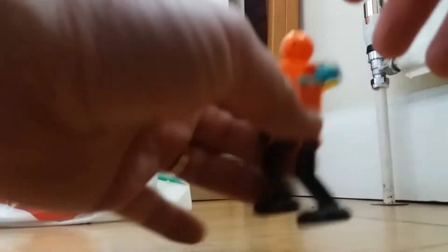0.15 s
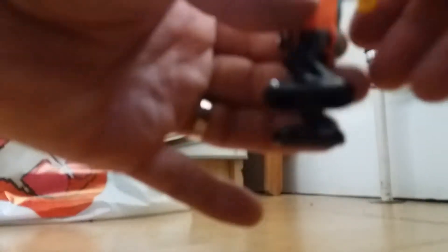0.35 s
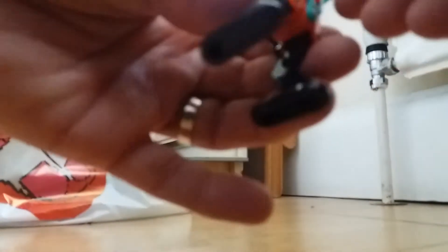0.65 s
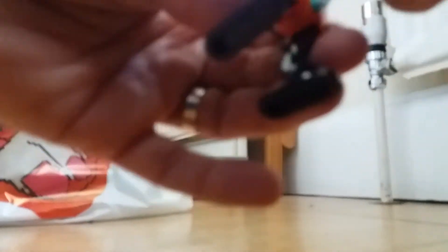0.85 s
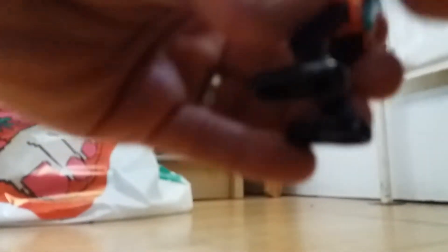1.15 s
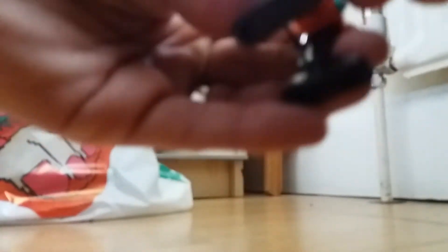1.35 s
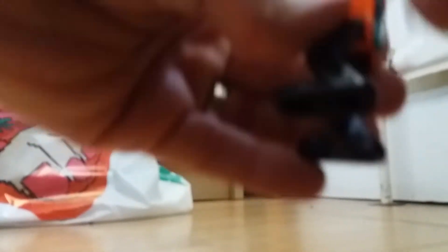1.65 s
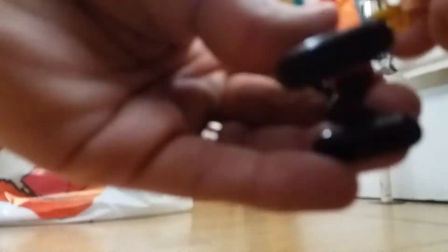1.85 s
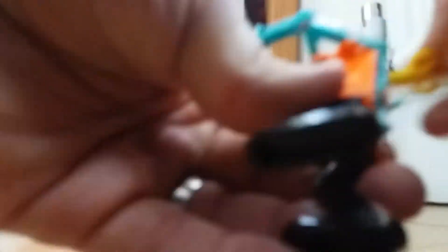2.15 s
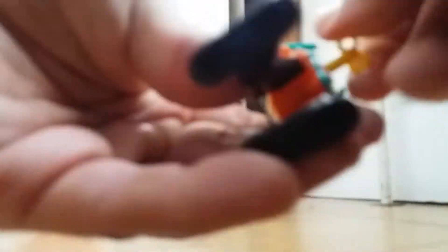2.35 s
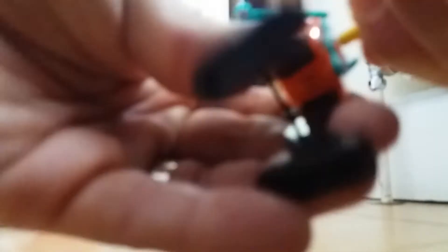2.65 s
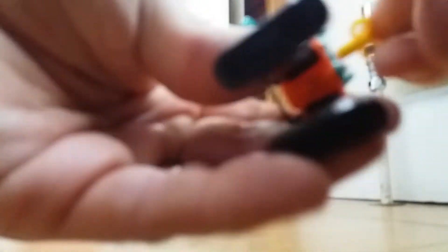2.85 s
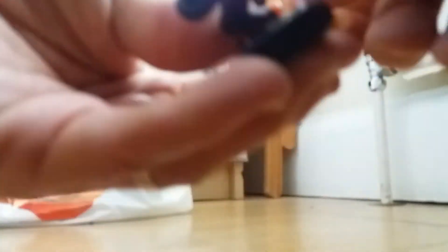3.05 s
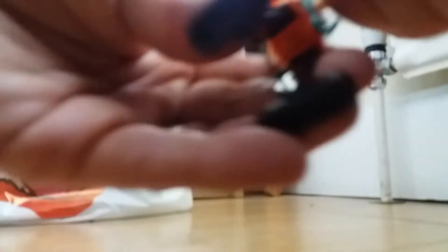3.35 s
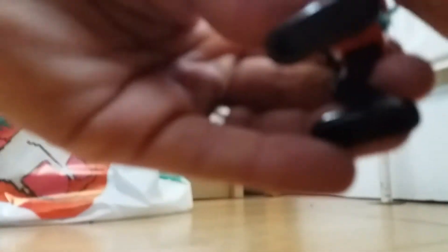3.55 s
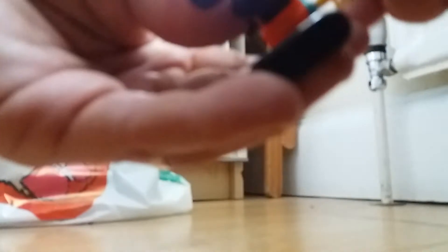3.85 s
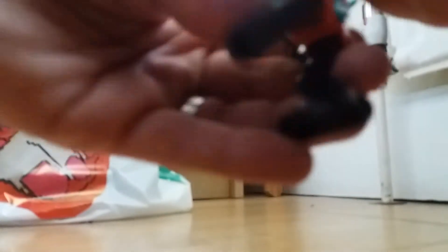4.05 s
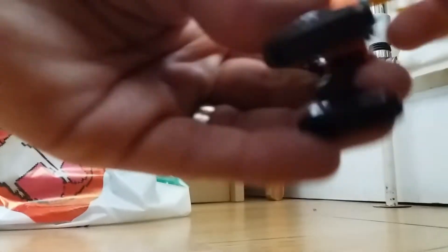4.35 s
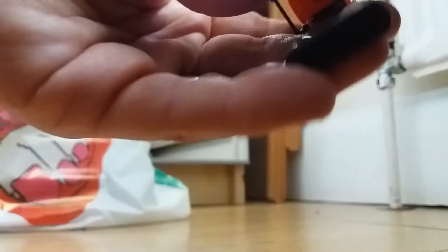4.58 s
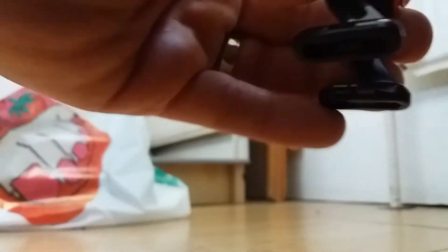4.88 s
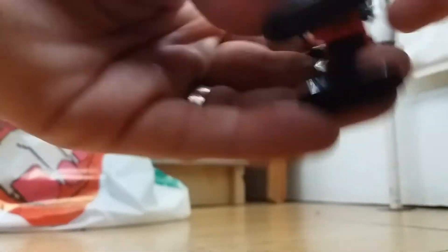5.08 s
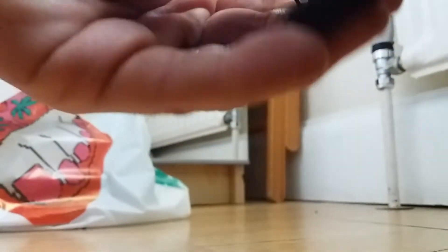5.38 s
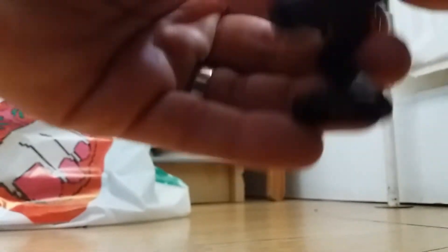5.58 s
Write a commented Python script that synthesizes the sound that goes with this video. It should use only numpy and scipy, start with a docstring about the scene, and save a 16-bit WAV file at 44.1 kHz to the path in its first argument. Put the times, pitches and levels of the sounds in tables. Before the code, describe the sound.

A small plastic clockwork toy is wound by hand, close to the microphone in a quiet room with a faint short tail and low background noise. From 0 to 0.35 s the free gears purr lightly, rising then slowing to nothing, under soft skin rubbing. At 0.8 s a dozen crisp, doubled ratchet clicks accelerate until 1.1 s, followed by tiny buzzes. Crowded crackles come at 1.45 and 1.95 s, with a brief whir at 1.65 s. A loud dry snap hits at 2.1 s, then bright whirs, the longest at 2.3 s singing thin and high. Fingers knock the case hard around 2.45-2.5 s. Clicking turns follow at 2.6, 3.3, 4.0 and 4.65 s, each about a quarter second, separated by short whirs, rapid ticks and rubs. A final small whir sounds at 5.0 s, a crackle at 5.4 s, then four slowing clicks and a faint last tick at 5.7 s.

```python
"""Winding a clockwork toy

A small plastic clockwork toy is wound by hand, close to the microphone, just above a hard floor indoors.
Each twist of the key drags a pawl over ratchet teeth; between twists the spring runs the gears in short whirs.
Every tooth is a burst of decaying noise and tones, filtered by the resonances of the part it strikes.
Fingers rub and bump the case as filtered noise, and a small room answers faintly with a decaying tail."""
import sys
import numpy as np
from scipy import signal
from scipy.fft import rfft, irfft, next_fast_len
from scipy.io import wavfile
from scipy.ndimage import uniform_filter1d

SR = 44100
rng = np.random.default_rng(int(sys.argv[2]) if len(sys.argv) > 2 else 0)


def wav_record(signal):
    """Record a signal, one row per channel, as 16-bit PCM in the file named by sys.argv[1]."""
    frames = np.transpose(np.atleast_2d(signal))
    bounded = np.clip(frames, -1, 1)
    # unit amplitude maps onto the largest positive 16-bit level
    quanta = np.round(bounded * 32767).astype(np.int16)
    wavfile.write(sys.argv[1], SR, quanta)


N = 252252
TIME = np.arange(N) / SR

# broad spectrum of a pawl blow: (frequency [Hz], level [dB])
PAWL_COLOUR = [(300, -19), (1150, -23.5), (1550, -4), (1900, -6.5), (2270, -2.5), (2700, -6.5), (3600, -3),
               (4700, -4), (6700, -12.5), (9400, -9.5), (12500, -16), (16000, -19.5)]
# resonances of the pawl and its spring: (frequency [Hz], width [Hz], level above the broad colour [dB])
PAWL_MODES = [(3707, 88, -0.5), (15060, 330, 8)]
# broad spectrum of a gearbox blow: (frequency [Hz], level [dB])
GEAR_COLOUR = [(300, -20), (1100, -20), (1600, -6), (2200, -5), (2900, -8), (3800, 1.5), (4600, 0.5),
               (5600, -5.5), (6800, -9), (8100, -3), (10000, -10), (16000, -11.5)]


def undb(db):
    """Level to amplitude: 20 dB is a factor of ten."""
    return 10 ** (np.asarray(db) / 20)


def colour(x, points, modes=(), treble_db=0):
    """Minimum-phase filtering: a causal broad colour with a treble shelf, in parallel with resonances."""
    size = next_fast_len(2 * len(x))
    hz = np.arange(size // 2 + 1) * SR / size + 1  # the offset avoids log(0)
    knots, knot_db = np.transpose(points)
    shelf_db = treble_db * hz ** 2 / (hz ** 2 + 6000 ** 2)
    db = np.interp(np.log(hz), np.log(knots), knot_db) + shelf_db
    # folding the cepstrum onto positive times gives the causal phase
    cepstrum = irfft(np.log(undb(db)), size)
    cepstrum[1:size // 2] *= 2
    cepstrum[size // 2 + 1:] = 0
    broad = np.exp(rfft(cepstrum))
    rings = sum(undb(d) / (1 + 1j * (hz ** 2 - f ** 2) / (hz * w)) for f, w, d in modes)
    return irfft(rfft(x, size) * broad * (1 + rings), size)[:len(x)]


def walk(rate):
    """Stepwise random process: normal values held 1 / rate s and smoothed into slopes."""
    hold = int(SR / rate)
    steps = np.repeat(rng.standard_normal(N // hold + 1), hold)
    return uniform_filter1d(steps, hold)[:N]


def add(out, s, x, db, head_s=0.0022):
    """Superposition: place a blow at time s, db being the RMS level of its first head_s seconds."""
    i = int(np.clip(s * SR, 0, N - 1))
    head = x[:int(head_s * SR)]
    blow = x * undb(db) / np.sqrt(np.mean(head ** 2))
    out[i:i + len(x)] += blow[:N - i]


def tick(decay_s, spot_share=0.62):
    """Impact excitation: a crack, a few modes that depend on where it lands, then the shell's faint ring."""
    t = np.arange(2048) / SR
    mode_hz = 2000 * 5 ** (rng.random((4, 1)) ** 1.3)  # 2 to 10 kHz, crowded low
    phase = rng.random((4, 1))  # in cycles
    tones = np.sin(2 * np.pi * (mode_hz * t + phase)).sum(axis=0)
    spot = tones * np.exp(-t / (1.4 * decay_s))
    fade = np.exp(-t / decay_s) + undb(-16) * np.exp(-t / .005)
    crack = rng.standard_normal(len(t)) * fade
    attack = 1 - np.exp(-(t / .0003) ** 2)
    return attack * (crack + spot_share * spot / 2)


def teeth_of(run, jitter):
    """Rotation into impacts: time, rate and level of the teeth passing as a wheel follows its speed curve."""
    s, hz, db = np.transpose(run)
    now = s[0]
    for chance in rng.standard_normal(100):  # at most 100 teeth
        rate = np.interp(now, s, hz)
        yield now, rate, np.interp(now, s, db)
        now += np.exp(jitter * chance) / rate
        if now > s[-1]:
            return


def rubbing():
    """Friction envelope: each slide swells, holds and dies away, its power added to the steady grip's."""
    # skin sliding on plastic: (start [s], length [s], level [dB])
    rubs = [(0.037, 0.12, -52.5), (0.167, 0.16, -47.5), (0.377, 0.11, -51.5), (0.804, 0.15, -50.5),
            (1.084, 0.18, -54), (1.412, 0.05, -51), (1.839, .13, -42.5), (2.167, 0.096, -46),
            (2.359, 0.19, -46), (2.626, 0.33, -57.5), (3.465, 0.27, -54.5), (3.923, 0.031, -52.5),
            (4.306, 0.096, -44), (4.795, 0.31, -50.5)]
    attack_s, release_s = 0.034, 0.045
    power = undb(-64) ** 2  # the holding hand never rests entirely
    for start, length, db in rubs:
        swell = np.clip((TIME - start) / attack_s, 0, 1)
        release = np.exp(-np.maximum(TIME - start - length, 0) / release_s)
        power = power + (undb(db) * swell * release) ** 2
    return np.sqrt(power)


def hand():
    """Forced resonance: skin rubbing in uneven slips and soft fingertip knocks sound the case's modes."""
    # broad spectrum of rubbing skin: (frequency [Hz], level [dB])
    skin_colour = [(30, -45), (50, -2), (120, -1.5), (185, -2), (300, -3.5), (400, -4.5), (620, -6),
                   (950, -11), (1700, -6.5), (3800, -13), (8000, -25), (16000, -32)]
    # the case held in the hand: (frequency [Hz], width [Hz], level above the broad colour [dB])
    case_modes = [(187, 88, 0), (395, 30, -4), (594, 280, 0), (1860, 690, -1)]
    # fingers knocking the case: (time [s], level [dB], spectral peak [Hz], decay [s])
    bumps = [(.003, -41.5, 1610, 0.0028), (.006, -46.5, 152, 0.0056), (1.224, -49.5, 570, 0.0029),
             (2.4516, -27.5, 644, 0.0049), (2.4548, -24, 1943, 0.0014), (2.496, -32.5, 1160, 0.0037),
             (2.498, -25.5, 225, 0.0051), (2.5017, -34, 420, 0.0038), (2.508, -43, 104, 0.019),
             (2.874, -45.5, 210, .017), (3.576, -38.5, 190, 0.0025), (3.618, -41.5, 1270, .0025),
             (3.621, -36.5, 182.5, 0.0064), (4.222, -41, 189.5, 0.0046)]
    slips_db = 3 * walk(rate=130)
    friction = rng.standard_normal(N) * undb(slips_db)
    skin = colour(friction, skin_colour, case_modes[:3])
    out = skin / skin.std() * rubbing()
    t = TIME[:SR // 8]
    for s, db, hz, decay in bumps:
        push = rng.standard_normal(len(t)) * np.exp(-t / decay)
        knock_colour = [(25, -40), (hz / 3, -5), (hz, 0), (2 * hz, -13), (16000, -58)]
        knock = colour(push, knock_colour, case_modes)
        add(out, s, knock, db, head_s=2 * decay)
    return out


def room_noise():
    """Stationary background: steady coloured noise of the quiet room."""
    # spectrum of the background: (frequency [Hz], level [dB])
    background_colour = [(25, -30), (45, 0.5), (100, 6), (200, -4), (600, -9), (1200, -18), (3500, -29),
                         (8000, -24.5), (16000, -23.5)]
    x = colour(rng.standard_normal(N), background_colour)
    return undb(-62) * x / x.std()


def room(x, t60_s, wet_db):
    """Reverberation: convolution with dense, exponentially decaying reflections off floor and near walls."""
    t = TIME[:SR // 2]
    decay = undb(-60 * t / t60_s) * (t > .004)  # silent for the first 4 ms
    tail = rng.standard_normal(len(t)) * decay
    tail = colour(tail, [(100, 3.5), (3500, -4.0), (8000, -1.5), (16000, -7.0)])
    unit_tail = tail / np.linalg.norm(tail)
    return undb(wet_db) * signal.fftconvolve(x, unit_tail)[:N]


def free_run():
    """Periodic impacts: running free as the toy is picked up, the gears tick evenly and lightly."""
    # speed curve of the free motor: (time [s], tooth rate [Hz], level [dB])
    free_curve = [(.05, 116.3, -41), (.09, 128.3, -39), (.13, 159, -35.5), (.175, 159.7, -35.5),
                  (.21, 147.3, -40), (.25, 89.1, -42.5), (.295, 89, -41), (.335, 72.6, -56)]
    # broad spectrum of the free gears: (frequency [Hz], level [dB])
    free_colour = [(300, -25), (1200, -5), (2400, 1), (3500, -8), (4200, 0), (5400, 5.5), (6600, 0),
                   (7900, -2), (10000, -8.5), (16000, -18)]
    # their resonances: (frequency [Hz], width [Hz], level above the broad colour [dB])
    free_modes = [(3430, 84, 17.5), (3620, 100, 15), (5460, 160, -12), (7950, 250, 2)]
    out = np.zeros(N)
    for s, hz, db in teeth_of(free_curve, jitter=.04):
        crack = colour(tick(decay_s=.0011), free_colour, free_modes)
        add(out, s, crack, db + rng.standard_normal())
    return out


def turn_teeth():
    """Variable-rate impacts: tooth spacing eases with the wrist, and level rises as the spring tightens."""
    # turns of the key: (start [s], tooth count, teeth per second at the start, middle and end [Hz],
    # mid-turn level [dB], delay of the pawl's second tick [s], treble [dB])
    turns = [ (0.8087, 12, 31.14, 39.5, 67, -36.5, 0.0041, -3),
             (2.5717, 7, 21.92, 36.13, 36, -31.5, 0.0056, -0.96),
             (3.2678, 9, 24.84, 39.8, 34.4, -34, 0.0046, -0.31),
             (3.9955, 9, 27.66, 43.48, 39, -33.5, 0.007, 1.7),
             (4.6465, 9, 28.18, 38.66, 28.7, -33, 0.0055, 0.55),
             (5.4368, 4, 20.34, 23.8, 15.3, -34.5, 0.0094, -0.009)]
    tighten_db, rebound_db = 2, -6  # rise from first tooth to last; second tick against the first
    for start, count, first_hz, middle_hz, last_hz, db, delay, treble_db in turns:
        along = np.linspace(0, 1, int(round(count)) - 1)
        gaps = np.interp(along, [0, .5, 1], [1 / first_hz, 1 / middle_hz, 1 / last_hz])
        since = np.r_[0, np.cumsum(gaps)]
        for s in since:
            tooth_db = db + tighten_db * (s / since[-1] - .5)
            yield start + s, tooth_db, delay, rebound_db, treble_db


def ratchet():
    """Impact and rebound: the pawl drops off each tooth and ticks again, usually lighter and brighter."""
    # lone teeth that slip as the key is gripped or released:
    # (time [s], level [dB], level of the pawl's second tick against the first [dB])
    lone_teeth = [(.689, -63, -12), (.714, -70, -21), (1.247, -35.5, -12), (1.6026, -36, -17),
                  (2.055, -29.5, -2), (3.221, -34.5, -6), (3.239, -32, -14), (3.566, -31, -11),
                  (3.966, -32.5, -17), (4.275, -35, -12), (4.6218, -34.5, -22), (5.144, -47, -14),
                  (5.165, -48, -12), (5.7014, -50, -2)]
    lone = [(s, db, .006, second_db, 0) for s, db, second_db in lone_teeth]  # second tick 6 ms later
    tooth_scatter_db, rebound_scatter_db, treble_scatter_db = 1.5, 1, 1.2
    rebound_treble_db, delay_jitter = 4.5, .12
    out = np.zeros(N)
    for s, db, delay, second_db, treble_db in [*turn_teeth(), *lone]:
        bright, force, bounce, lag = rng.standard_normal(4)
        drop_treble_db = treble_db + treble_scatter_db * bright
        drop = colour(tick(decay_s=.0014), PAWL_COLOUR, PAWL_MODES, drop_treble_db)
        add(out, s, drop, db + tooth_scatter_db * force)
        rebound = colour(tick(decay_s=.0015), PAWL_COLOUR, PAWL_MODES, treble_db + rebound_treble_db)
        rebound_s = s + delay * np.exp(delay_jitter * lag)
        add(out, rebound_s, rebound, db + second_db + rebound_scatter_db * bounce)
    return out


def spin(start, rise, hold, brake, top_hz, top_db):
    """Rotational speed and impact level: the gears spin up, run, and are braked by the fingers."""
    # shares of the top rate: the gears break loose at the first and stall at the last
    share = np.array([.56, 1, 1, .43])
    times = start + np.cumsum([0, rise, hold, brake])
    level_db = top_db + 15 * np.log2(share)  # faster teeth strike harder: 15 dB per octave
    return np.c_[times, top_hz * share, level_db]


def gears():
    """Alternating impacts: the escapement rocks, so blows go strong and weak; speed makes a wheel sing."""
    # gears spinning while the key is let go:
    # (start [s], spin-up [s], hold [s], braking [s], top tooth rate [Hz], top level [dB])
    whirs = [ (1.078, 0.011, 0.018, .025, 239.2, -33), (1.159, .006, 0.0069, 0.037, 131.7, -42),
             (1.221, 0.013, .012, 0.031, 170, -41), (1.642, .022, .022, 0.039, 248.5, -29),
             (2.148, .014, 0.021, 0.031, 291.2, -24.5), (2.21, .012, 0.0086, 0.043, 164.8, -34),
             (2.311, .018, .09, .034, 324.6, -26), (2.508, .007, .022, .01, 233.8, -31),
             (2.828, .013, .013, 0.042, 234.6, -33.5), (3.603, 0.028, 0.017, 0.019, 227, -31),
             (4.308, 0.015, 0.0085, 0.056, 246.8, -32), (5.026, 0.0075, .011, 0.037, 294.3, -29)]
    # gearbox resonances: (frequency [Hz], width [Hz], level above the broad colour [dB])
    gear_modes = [(3750, 190, -2), (4500, 155, 3.5), (5790, 270, 0)]
    # a thin wheel at full song: (frequency [Hz], width [Hz], level above the broad colour [dB])
    wheel_mode = (11030, 370, 12.4)
    # tooth rates over which the wheel comes to sing: (faint [Hz], full [Hz])
    sing_hz = (285, 322)
    out = np.zeros(N)
    for whir in whirs:
        for k, (s, hz, db) in enumerate(teeth_of(spin(*whir), jitter=.05)):
            sing_db = np.interp(hz, sing_hz, [-22, 0])
            modes = [*gear_modes, np.add(wheel_mode, [0, 0, sing_db])]
            crack = colour(tick(decay_s=.00085), GEAR_COLOUR, modes)
            uneven_db = 1.7 * (-1) ** k + 1.2 * rng.standard_normal()
            add(out, s, crack, db + uneven_db)
    return out


def quick_twists():
    """Crowded impacts: in quick twists of the key the pawl's ticks run together."""
    # quick twists: (start [s], end [s], level at the start [dB], at full push [dB], at the end [dB])
    twist_table = [ (1.428, 1.582, -36.5, -37, -34.5), (1.722, 1.767, -49, -37.5, -47.5),
                   (1.924, 2.044, -39.5, -34, -35), (2.295, 2.308, -37, -41, -40),
                   (3.194, 3.218, -48.5, -49, -35), (3.925, 4.024, -54, -35.5, -48.5),
                   (4.291, 4.309, -44, -38, -38), (4.597, 4.715, -42, -38.5, -42),
                   (5.36, 5.425, -46, -39.5, -41)]
    tick_hz, push_s, scatter_db = 162.8, .016, 4  # mean tick rate; time to full push; spread of level
    out = np.zeros(N)
    for start, end, first_db, push_db, last_db in twist_table:
        run = [(start, tick_hz, first_db), (start + push_s, tick_hz, push_db), (end, tick_hz, last_db)]
        for s, hz, db in teeth_of(run, jitter=0.28):
            crack = colour(tick(decay_s=.0014), PAWL_COLOUR, PAWL_MODES, treble_db=1.5)
            add(out, s, crack, db + scatter_db * rng.standard_normal())
    return out


def snap():
    """Single impact: one hard, dry blow through the whole gearbox, with little modal ring."""
    # the loud snap: (time [s], level [dB], decay [s])
    s, db, decay = (2.0918, -19.5, 0.00094)
    out = np.zeros(N)
    blow = colour(tick(decay, spot_share=0.28), GEAR_COLOUR, treble_db=-3.0)
    add(out, s, blow, db)
    return out


def scene():
    """Superposition of direct sound, reverberation and background: toy and hand in a quiet room."""
    toy = hand() + free_run() + ratchet() + gears() + quick_twists() + snap()
    return (toy + room(toy, t60_s=0.22, wet_db=-14.5) + room_noise())[None]


def record(dry):
    """Band limiting: the recorder cuts the top above 16 kHz with a steep elliptic low-pass."""
    low_pass = signal.ellip(8, .2, 70, 16000, fs=SR, output="sos")  # order, ripple dB, stop-band dB, Hz
    return signal.sosfilt(low_pass, dry)


dry = scene()
out = record(dry)
wav_record(out)
```